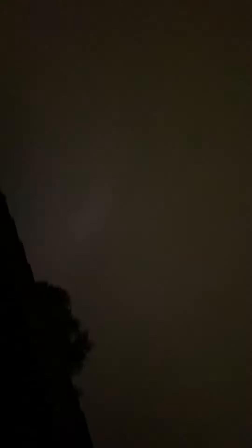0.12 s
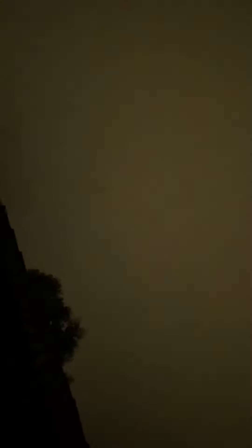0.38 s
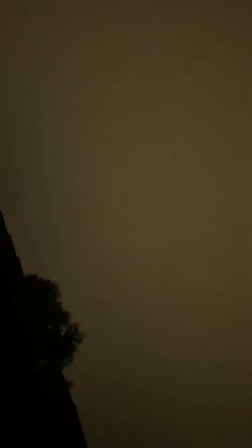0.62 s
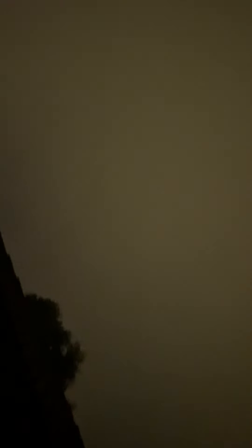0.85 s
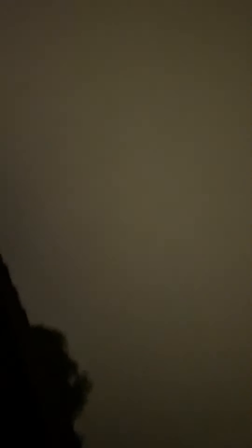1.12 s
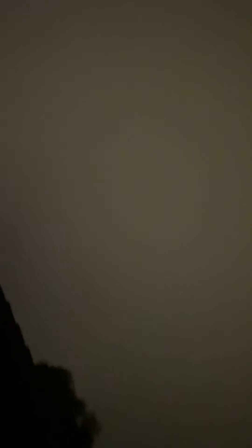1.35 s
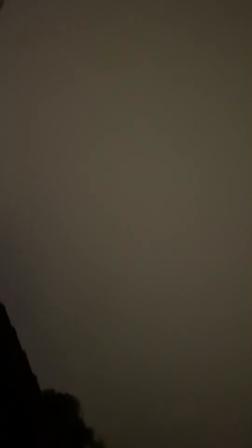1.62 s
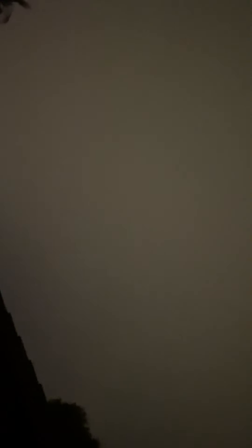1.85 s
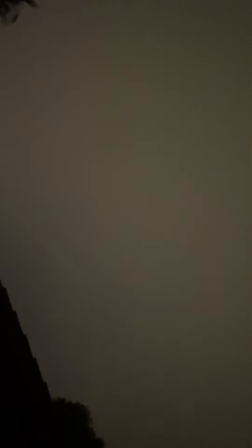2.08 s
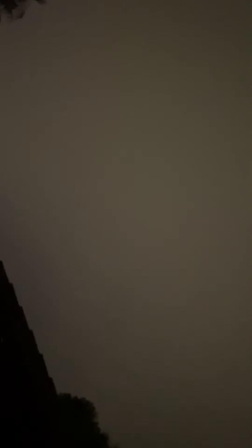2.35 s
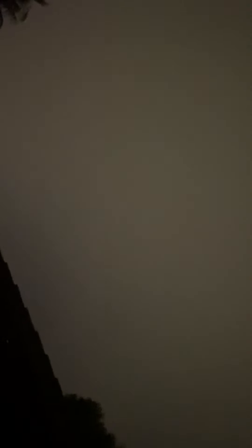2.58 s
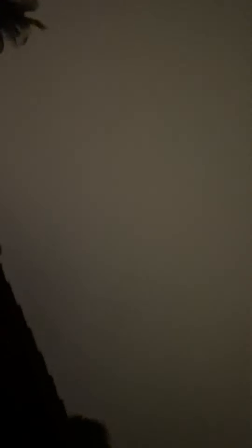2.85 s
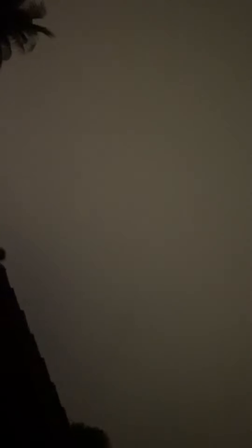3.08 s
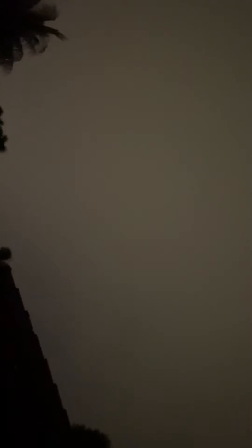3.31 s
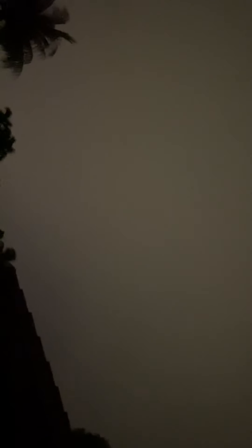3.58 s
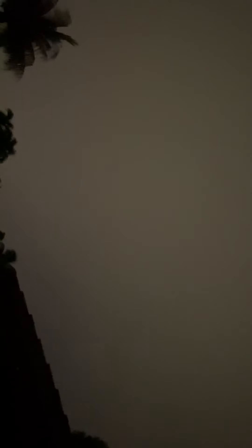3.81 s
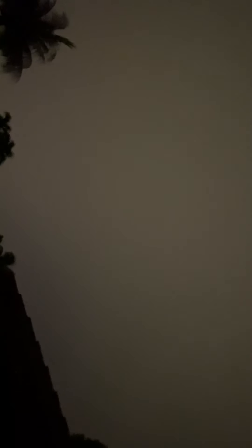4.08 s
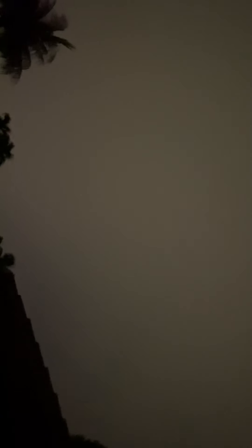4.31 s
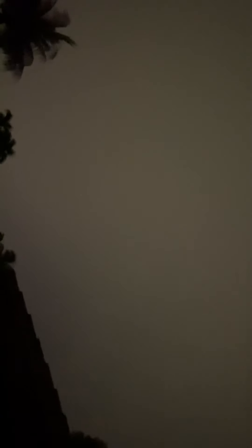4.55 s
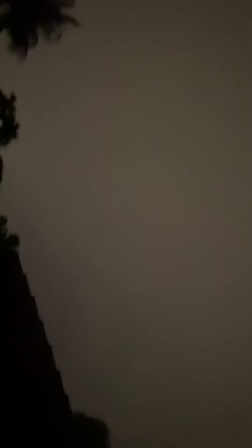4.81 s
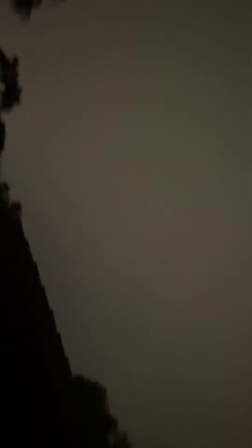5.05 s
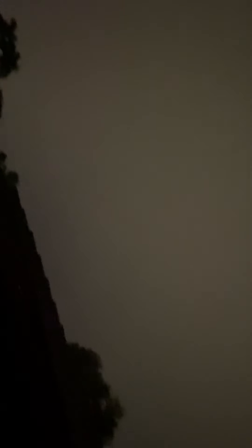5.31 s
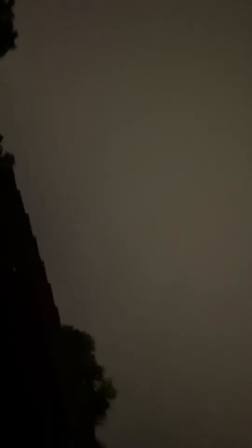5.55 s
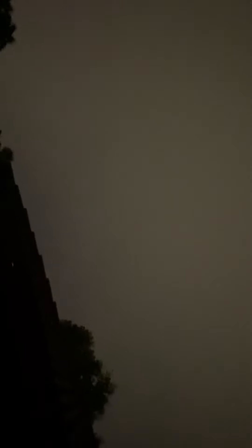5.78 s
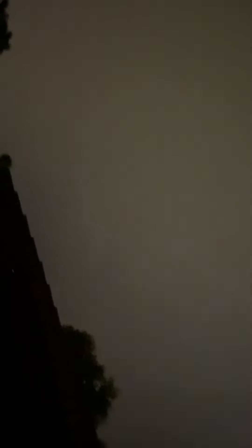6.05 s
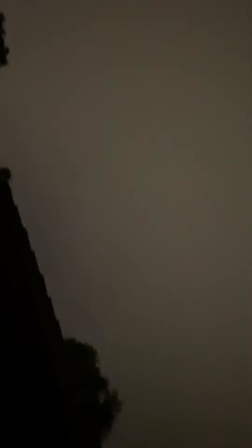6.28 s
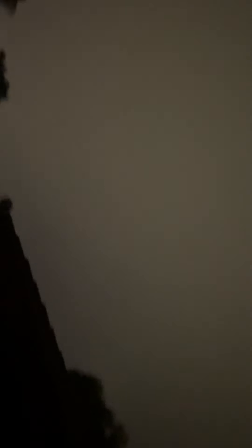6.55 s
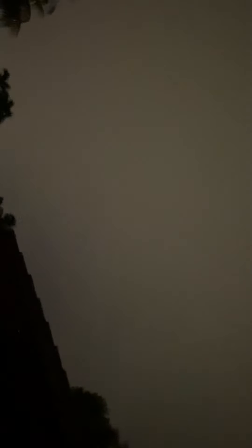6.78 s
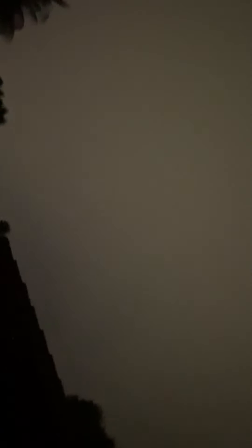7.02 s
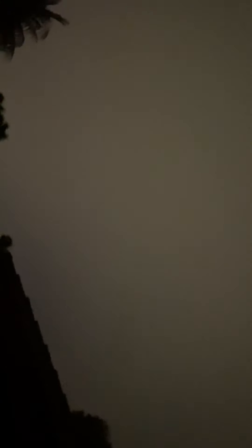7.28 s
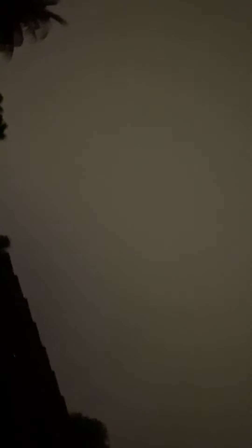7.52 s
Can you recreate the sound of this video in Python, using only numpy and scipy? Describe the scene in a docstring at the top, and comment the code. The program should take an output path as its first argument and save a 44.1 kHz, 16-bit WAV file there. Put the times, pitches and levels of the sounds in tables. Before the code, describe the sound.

Low rumbling thunder at night rises within two seconds and fades in smaller surges, while fine rain hisses and close drops tick, splash and ring metal.

```python
"""Thunder over a wet yard at night

Shocks from the bends of a far lightning channel arrive in peals: dense random blows through resonances.
Light rain is hissing noise with small sprays, and it rings a gutter; single drops splash close by,
each built from one or more ticks with a splash or ring.
A small two-port microphone weakens the deepest bass and turns left against right in the treble."""
import sys
import numpy as np
from scipy import signal
from scipy.fft import rfft, irfft, next_fast_len
from scipy.io import wavfile
from scipy.ndimage import uniform_filter1d, map_coordinates

SR = 44100
rng = np.random.default_rng(int(sys.argv[2]) if len(sys.argv) > 2 else 0)


def to_linear_factor(level_db):
    """Convert decibel levels (scalar or array-like) to linear amplitude factors."""
    exponent = np.asarray(level_db, float) / 20
    return 10 ** exponent


def file_out(sig):
    """Save sig as 16-bit WAV at sys.argv[1]."""
    # one column per channel
    cols = np.atleast_2d(sig).T
    # limit, then scale
    lim = np.clip(cols, -1, 1)
    pcm = np.round(lim * 32767).astype(np.int16)
    wavfile.write(sys.argv[1], SR, pcm)


N = 337010  # length in samples


def unit(x):
    """Scaled to rms 1."""
    return x / np.sqrt(np.mean(x ** 2) + 1e-20)


def along(points, hz):
    """Reads a curve of (Hz, value) points on a log frequency axis."""
    f, v = np.transpose(points)
    return np.interp(np.log(hz + 1), np.log(f + 1), v)


def curves(rows):
    """One value per sample for each column after the time."""
    s, *cols = np.transpose(rows)
    return [np.interp(np.arange(N) / SR, s, c) for c in cols]


def wobble(rate):
    """A smooth random curve through random knots, rate of them a second."""
    knots = rng.standard_normal(int(N * rate / SR) + 4)
    return map_coordinates(knots, [np.arange(N) * rate / SR])


def filtered(x, response):
    """x times a complex response of frequency."""
    m = next_fast_len(x.shape[-1] + 8192)
    spectrum = rfft(x, m) * response(np.fft.rfftfreq(m, 1 / SR))
    return irfft(spectrum, m)[..., :x.shape[-1]]


def resonance(hz, centre_hz, width_hz):
    """A causal resonance of peak gain 1."""
    return 1j * hz * width_hz / (centre_hz ** 2 - hz ** 2 + 1j * hz * width_hz)


def taps(rate, spread_db):
    """Random blows at both ports, rate of them a second at each, mostly small and a few large."""
    draw = rng.random((3, 2, N))
    struck = draw[0] < rate / SR
    sign = np.sign(draw[1] - .5)
    size = to_linear_factor(-spread_db * np.log(draw[2] + 1e-4))
    return struck * sign * size


def evened(x, even, span_s):
    """x with part of its chance swells taken out: even 0 leaves them, 1 takes out most."""
    span = int(span_s * SR)
    swell = uniform_filter1d(uniform_filter1d(unit(x) ** 2, span), span)
    return unit(x / (np.abs(swell) + 0.013) ** (even / 2))


def shocks(response, even, span_s):
    """A dense train of shocks in one colour; overlapping paths even out part of its swells."""
    x = filtered(taps(900, spread_db=1.5), response)
    x = evened(x, even, span_s)
    # a second pass deepens the colour by half
    return unit(filtered(x, lambda hz: np.sqrt(np.abs(response(hz)))))


# Claps that stand out of the roll. Each row: peak time in seconds, boom level in dB, length in seconds,
# centre of the boom in Hz, ringing of the yard in dB over the boom.
CLAPS = [(0.128, -26, 0.021, 99, -2), (0.188, -24, 0.028, 70.5, -28), (0.377, -27.5, 0.098, 69.8, -21),
         (0.583, -24.5, 0.044, 61.7, -12.5), (1.124, -27, 0.029, 73.4, 3), (1.152, -20, 0.048, 69.7, -8),
         (1.309, -21, 0.2, 82.8, -7.5), (1.576, -17.5, 0.038, 63.3, -3.5), (1.636, -12, 0.087, 66.5, -20.5),
         (1.765, -16.5, 0.072, 64.4, -22), (1.933, -38.5, 0.028, 66.2, -14.5),
         (2.104, -16, 0.049, 79, -18.5), (2.172, -25, 0.068, 74, -4.5), (2.292, -19, 0.023, 70.6, -10),
         (2.409, -34, 0.029, 70.3, -24), (2.585, -14.5, 0.041, 80.7, -23), (2.713, -15, 0.056, 81.7, -9),
         (2.798, -22, 0.046, 79, -36), (2.973, -21, 0.018, 73, -16), (3.559, -40, 0.047, 83.8, -2),
         (3.637, -26, 0.028, 77.8, -27), (3.721, -26.5, 0.044, 85, -2), (3.816, -26.5, 0.039, 78.4, -2.5),
         (4.016, -19, 0.069, 93.8, -5), (4.406, -29.5, 0.056, 64.2, -12.5),
         (4.609, -28.5, 0.05, 79.4, -8.5), (4.758, -20.5, 0.045, 79.2, -10.5),
         (5.076, -31.5, 0.11, 69.6, -13), (5.309, -33, 0.049, 75.3, -12), (5.416, -32, 0.069, 66.7, -30),
         (5.973, -33, 0.041, 70.2, -7.5), (6.196, -30.5, 0.082, 76, -37), (6.379, -27.5, 0.11, 71.8, -20.5),
         (6.666, -20, 0.047, 77.5, -29), (6.84, -24.5, 0.033, 77.5, -18),
         (6.924, -20.5, 0.034, 66.5, -17.5), (7.1, -19.5, 0.051, 76.3, -17.5),
         (7.385, -28, 0.074, 78.4, -17.5)]
CLAP_S, CLAP_DB, CLAP_LENGTH_S, CLAP_HZ, CLAP_YARD_DB = np.transpose(CLAPS)
RISE, FALL = 0.38, 0.55  # flanks of a clap, as shares of its length
FRONT_RISE, FRONT_FALL = .3, 0.94  # the upper parts of a clap strike faster and may ring longer


def claps(levels_db, rise, fall):
    """Power of all claps over time: each rises quickly and falls more slowly."""
    t = np.arange(0, N, 32) / SR - CLAP_S[:, None]  # one value for every 32 samples
    flank_s = CLAP_LENGTH_S[:, None] * np.where(t < 0, rise, fall)
    shape = np.exp(-(t / flank_s) ** 2)
    power = np.sum(to_linear_factor(levels_db)[:, None] ** 2 * shape, axis=0)
    return np.repeat(power, 32)[:N]


# Basic colour of the boom, scaled where it is played. Each row: frequency in Hz, strength in relative dB.
BOOM_COLOUR = [(13, -52.5), (22, -19), (39, -8), (59, 1), (80, -10.5), (113, -9), (140, -1.5), (180, -59.5),
               (310, -120)]
# Centre of the boom between claps, lower where longer shocks arrive. Each row: time in seconds, centre in Hz.
ROLL_CENTRE = [(0, 74.8), (.5, 69.4), (1.2, 68.7), (1.7, 61.4), (2.2, 62.8), (2.5, 78.8), (3.1, 74.4),
               (3.5, 73), (4.1, 62.6), (4.7, 73), (5.9, 66.8), (6.9, 67.2), (7.64, 70.8)]


def boom(roll_db):
    """Deep thunder: longer shocks sound deeper, so four fixed colours are cross-faded by a moving centre."""
    roll_power = to_linear_factor(roll_db + 1.34 * wobble(24)) ** 2
    power = roll_power + claps(CLAP_DB, RISE, FALL)
    # the loudest arrival sets the centre: a mean weighted by power
    roll_hz = curves(ROLL_CENTRE)[0] * (1 + 0.028 * wobble(5.7))
    clap_power_hz = claps(CLAP_DB + 10 * np.log10(CLAP_HZ), RISE, FALL)
    centre_hz = (roll_power * roll_hz + clap_power_hz) / power
    mix = 0
    colours_hz = [54, 68, 86, 112]
    shares = np.array([np.exp(-(np.log(centre_hz / c) / .2) ** 2) + .12 for c in colours_hz])
    shares = shares / np.linalg.norm(shares, axis=0)
    for share, c in zip(shares, colours_hz):
        colour = lambda hz: to_linear_factor(0.37 * along(BOOM_COLOUR, hz)) * resonance(hz, c, 0.32 * c)
        mix = mix + share * shocks(colour, even=0.39, span_s=0.018)
    # the colours beat against each other less than their sum swells
    return np.sqrt(power) * evened(mix, even=0.78, span_s=0.077)


# Standing wave between the houses. The row: centre in Hz, width in Hz.
YARD = (163, 15)


def yard(near_db):
    """The yard resonates under the shocks; between claps it gains as the growl passes -46.5 dB."""
    roll_db = near_db - 2.5 + 0.18 * (near_db + 46.5)
    power = to_linear_factor(roll_db + 2.8 * wobble(23)) ** 2
    power = power + claps(CLAP_DB + CLAP_YARD_DB, FRONT_RISE, FRONT_FALL)
    return np.sqrt(power) * shocks(lambda hz: resonance(hz, *YARD), even=0.6, span_s=0.031)


# Basic colour of the growl, scaled where it is played. Each row: frequency in Hz, strength in relative dB.
GROWL_COLOUR = [(110, -39.5), (185, -5.5), (226, -1.5), (274, -5.5), (365, -12), (426, -20.5), (502, -18.5),
                (730, -35.5), (800, -36), (1040, -62.5), (1760, -120)]


def growl(near_db):
    """Shocks of nearer bends; sharp claps that ring the yard growl more."""
    clap_growl_db = CLAP_DB - 15 + 0.25 * CLAP_YARD_DB
    power = to_linear_factor(near_db + 1.72 * wobble(10)) ** 2 + claps(clap_growl_db, FRONT_RISE, FALL)
    colour = lambda hz: to_linear_factor(1.08 * along(GROWL_COLOUR, hz))
    return np.sqrt(power) * shocks(colour, even=0.049, span_s=0.022)


# Upper bass kept by the nearest bends. The row: centre in Hz, width in Hz.
RASP = (314, 293)


def rasp(level_db):
    """Shocks of the nearest bends, through the same resonance twice."""
    train = shocks(lambda hz: resonance(hz, *RASP) ** 2, even=0.12, span_s=.013)
    return train * to_linear_factor(level_db + 0.94 * wobble(11))


def far_thunder():
    """Thunder from the far end of the storm never quite stops: a steady low train of shocks."""
    return to_linear_factor(-47.0) * shocks(lambda hz: resonance(hz, 59, 46), even=0.26, span_s=0.073)


# The roll under the claps. Each row: time in seconds, deep boom in dB, growl of nearer bends in dB,
# rasp of the nearest bends in dB over the growl.
ROLL = [(0, -35, -43.5, -1), (.3, -32.5, -39, -7), (.55, -38.5, -41, -6.5), (.75, -30.5, -47, 4.5),
        (.95, -36.5, -47.5, 0.5), (1.108, -44, -48, -3.5), (1.125, -27, -32, -22), (1.25, -26.5, -38, -8.5),
        (1.45, -23, -40, -8), (1.55, -14, -28.5, -16), (1.8, -22.5, -38.5, -7), (1.9, -25.5, -39, -8),
        (2.25, -27.5, -37, -13.5), (2.46, -35, -37, -11.5), (2.53, -23.5, -35, -10.5),
        (2.65, -25, -34.5, -12), (2.76, -23.5, -36, -8.5), (2.9, -28, -41, -6), (3.2, -34, -41, -9),
        (3.45, -39, -48.5, -4.5), (4.15, -32.5, -44.5, -7.5), (4.32, -40, -48, -17), (4.45, -32, -43, -8.5),
        (4.85, -35, -45.5, -9.5), (5.12, -45.5, -49, -6), (5.24, -45.5, -53.5, -1), (5.36, -32.5, -49, -3),
        (5.85, -36.5, -48, -10), (6.3, -31, -44, -10), (6.55, -31, -40.5, -7), (6.8, -24.5, -36, -8.5),
        (6.96, -26, -37, -10), (7.15, -28.5, -36.5, -10), (7.3, -30.5, -39, -11), (7.64, -32.5, -48.5, -6)]


def thunder():
    """A slow roll with claps on it drives the boom, the ringing of the yard and the growl of nearer bends."""
    roll_db, near_db, rasp_db = curves(ROLL)
    return boom(roll_db) + yard(near_db) + growl(near_db) + rasp(near_db + rasp_db) + far_thunder()


def patchy(x, frame, depth_db, bins, frames):
    """x with random patches of loudness, smoothed over so many frequency bins and time frames."""
    z = signal.stft(x, nperseg=frame)[2]
    field = rng.standard_normal(z.shape[1:])
    field = uniform_filter1d(uniform_filter1d(field, size=bins, axis=0), size=frames, axis=1)
    return signal.istft(z * to_linear_factor(depth_db * unit(field)), nperseg=frame)[1][:, :N]


# Colour of the far rain. Each row: frequency in Hz, strength in relative dB per Hz.
HISS = [(250, 4.5), (450, -3.5), (700, -4), (1200, -7), (2000, -9), (4000, -17), (6000, -22.5), (9000, -38),
        (14500, -30), (16500, -39.5)]


def rain_hiss():
    """Far rain: many drops blend into patchy noise that wavers slowly."""
    noise = patchy(rng.standard_normal((2, N)), frame=512, depth_db=1.5, bins=16, frames=10)
    hiss = unit(filtered(noise, lambda hz: to_linear_factor(along(HISS, hz))))
    return to_linear_factor(-52.5 + .6 * wobble(5.3)) * hiss


# Modes of the gutter. Each row: centre in Hz, width in Hz, strength in dB.
GUTTER = [(878, 40, -6.5), (1248, 40, -16), (1397, 18, -.5), (1482, 36, -7), (1600, 70, -14),
          (2470, 150, -13), (4200, 180, -21), (5245, 60, -22)]


def gutter(hz):
    """Response of all the modes of the gutter together, with alternating signs."""
    return sum((-1) ** k * to_linear_factor(db) * resonance(hz, c, w) for k, (c, w, db) in enumerate(GUTTER))


def gutter_ring():
    """Many small drops wander along the gutter, so its modes come and go one by one."""
    ring = filtered(taps(900, spread_db=2.5), gutter)
    ring = unit(patchy(ring, frame=1024, depth_db=2.7, bins=2, frames=14))
    return to_linear_factor(-59.5 + 2.5 * wobble(22)) * ring


def leaf_grains():
    """Tiny dry ticks of drops on leaves: sparse blows through a broad resonance, twice."""
    grains = filtered(taps(110, spread_db=2), lambda hz: resonance(hz, 3300, 3500) ** 2)
    return to_linear_factor(-74) * unit(grains)


def patter():
    """Nearer drops leave short bright sprays: noise bursts in four bands, each dying by 60 dB in 0.11 s."""
    fading = to_linear_factor(-60 * np.arange(SR // 5) / SR / .11)
    out = 0
    for centre_hz, db in [(2800, -73), (4800, -76), (9000, -77), (13500, -77)]:
        bursts = signal.fftconvolve(np.abs(taps(16, spread_db=2.5)[0]), fading)[:N]
        noise = bursts * rng.standard_normal((2, N))
        band = filtered(noise, lambda hz: resonance(hz, centre_hz, 1.6 * centre_hz) ** 2)
        out = out + to_linear_factor(db) * unit(band)
    return out


def rain():
    """Far rain is a hiss in patches; nearer drops ring the gutter, tick and leave short bright sprays."""
    return rain_hiss() + gutter_ring() + patter() + leaf_grains()


# Parts of near drops: each is a tick with a splash or ring, and a drop may have several rows.
# Each row: start in seconds, level in dB, centre in Hz, width as a share of the centre,
# seconds the splash or ring takes to die by 60 dB.
DROP_PARTS = [(0.076, -51, 12750, 0.21, 0.17), (0.5268, -38.5, 4320, 0.84, 0.17),
              (0.527, -42, 5240, 0.075, 0.2), (0.535, -52, 4200, 0.068, 0.17),
              (0.546, -46, 5600, 0.18, 0.19), (0.6146, -43, 12400, 5.3, 0.26),
              (0.627, -46.5, 2970, 1.3, 0.23), (0.698, -48, 12400, 1.4, 0.054),
              (0.723, -49.5, 9850, .6, 0.089), (.857, -37, 3480, 1.1, 0.022),
              (1.04, -51.5, 4050, 1.2, 0.28), (1.848, -42, 3760, 0.9, 0.054),
              (2.03, -40.5, 13300, 8.3, 0.14), (2.6708, -38.5, 3610, 1.4, 0.015),
              (2.68, -42, 8970, 2, 0.14), (2.8205, -39, 3000, 0.94, 0.017),
              (2.9609, -39.5, 3900, 1.2, 0.012), (2.9721, -35.5, 4020, 1.5, 0.012),
              (2.9768, -40, 5580, 1.6, 0.014), (2.9906, -34.5, 2380, 0.35, 0.014),
              (2.9913, -34, 5400, 0.74, .012), (3.011, -51.5, 11500, 0.67, .015),
              (3.136, -51, 8970, 1.8, .015), (3.161, -47, 8000, 2.9, .16), (3.252, -49, 2950, 1.3, 0.063),
              (3.307, -52, 13070, 1.4, .13), (3.442, -46, 14300, 1.8, .15),
              (4.219, -34, 4300, 0.062, 0.083), (4.2217, -36.5, 3640, 0.22, 0.087),
              (4.232, -39.5, 3940, 0.36, 0.037), (4.2202, -40.5, 2280, 0.33, 0.039),
              (4.239, -50.5, 11460, 0.42, 0.1), (4.309, -60, 11500, .2, 0.054),
              (4.4285, -31.5, 13680, 0.14, 0.017), (4.4284, -27.5, 7720, 10, 0.15),
              (4.4284, -37, 5300, 0.05, 0.1), (4.59, -45, 3410, 2, 0.14), (4.598, -41.5, 2470, 0.97, 0.068),
              (4.9038, -42.5, 11820, 0.23, 0.082), (4.9047, -38, 7000, 4, 0.11),
              (5.171, -50.5, 12400, 0.52, 0.081), (5.345, -56, 14200, .6, 0.16),
              (5.383, -48.5, 3460, 0.41, 0.026), (5.628, -48, 3920, 1, 0.2),
              (5.66, -61.5, 4300, 0.11, 0.68), (6.111, -44, 6000, 2, 0.03), (6.255, -52, 4000, 0.8, 0.1),
              (6.313, -54, 5050, .03, 0.049), (6.337, -54, 10950, 0.18, .03),
              (6.416, -52.5, 5630, 0.12, .22), (6.531, -57.5, 8970, 2, 0.024),
              (6.6276, -46.5, 11160, 0.13, 0.15), (6.81, -50, 6470, 2.9, 0.025),
              (6.813, -52, 5300, 0.13, 0.13), (6.918, -51, 3830, 0.22, 0.11), (6.931, -47, 2690, 0.57, 0.2),
              (6.942, -49, 3420, 0.067, 0.12), (7.25, -47, 2300, .4, 0.068),
              (7.475, -57, 4200, 0.18, 0.051)]
SNAP, CRACKLE, TICK_S = 4.5, .5, .0003  # the instant of impact, the crackle around it and its rise time


def near_drops():
    """Near drops, of one or more parts: a sharp tick with a splash or ring dying away around its own pitch."""
    out, t = np.zeros((2, N + SR)), np.arange(SR // 3) / SR
    for s, db, hz, width, t60 in DROP_PARTS:
        crackle = rng.standard_normal(len(t)) * (t / TICK_S) * np.exp(1 - t / TICK_S)
        tick = CRACKLE * crackle + SNAP * (t == t[4])
        splash_db = -7 + 3.5 * np.log2(t60 / 0.16)  # longer splashes are also stronger
        splash = rng.standard_normal((2, len(t))) * to_linear_factor(splash_db - 60 * t / t60)
        level = np.sqrt(16000 / (width * hz))  # makes up for narrow bands
        inner_hz = (0.55 + 0.35 * width) * hz  # width of the second resonance
        colour = lambda f: level * resonance(f, hz, width * hz) * resonance(f, hz, inner_hz)
        spray = lambda f: to_linear_factor(-27.0) * resonance(f, 5300, 18000)
        part = filtered(tick + splash, lambda f: colour(f) + spray(f))
        out[:, round(s * SR):][:, :len(t)] += to_linear_factor(db) * part
    return out[:, :N]


# The louder drips that knock on the gutter. Each row: time in seconds, strength in relative dB.
KNOCKS = [(0.33, -43), (0.38, -42.5), (0.521, -45), (0.622, -41), (1.031, -51), (2.305, -42.5),
          (2.502, -43), (2.881, -51), (2.963, -45), (3.146, -39.5), (3.447, -46), (3.932, -44),
          (4.125, -44.5), (4.243, -54), (4.425, -38), (4.589, -39), (4.782, -50), (5.234, -44),
          (5.554, -41), (5.622, -44), (5.787, -41), (5.832, -49), (5.87, -49), (6.058, -43), (6.413, -43.5),
          (6.925, -42), (7.32, -48)]


def gutter_knocks():
    """Drips strike the gutter's modes; the contact of a drip favours the middle ones."""
    chance = rng.random((2, N))
    # about two softer drips a second fall at random
    blows = (chance[0] < 2 / SR) * to_linear_factor(-57.2 + 3.2 * chance[1])
    s, db = np.transpose(KNOCKS)
    blows[np.round(s * SR).astype(int)] = to_linear_factor(db)
    # a drip lands as a short flurry, not one blow
    fading = to_linear_factor(-60 * np.arange(SR // 3) / SR / 0.16)
    flurry = rng.standard_normal(N) * signal.fftconvolve(blows, fading)[:N] + 4 * blows
    # the blow needs more force than the ring that is heard
    return filtered(to_linear_factor(20) * flurry, lambda f: gutter(f) * resonance(f, 1500, 790))


def scene():
    """What reaches the two microphone ports."""
    return thunder() + rain() + near_drops() + gutter_knocks()


def low_pass(x):
    """Removes everything above the highest recorded frequency."""
    return signal.sosfilt(signal.butter(12, 17030, fs=SR, output="sos"), x)


# Turn of the sound from the sum towards the difference of the ports. Each row: frequency in Hz, radians.
TURN = [(40, .008), (110, .024), (200, .057), (380, .15), (700, .37), (1100, .4), (2000, .34), (3300, .45),
        (4800, .55), (6000, .9), (7000, 1.5), (7900, 1.64), (9800, 3.06), (10900, 3.22), (12750, 4.63),
        (14100, 4.8), (15600, 6.0)]
# Likeness of the sound at the two ports. Each row: frequency in Hz, likeness from 0 to 1.
ALIKE = [(1800, 0.1), (3000, .6), (6000, .7), (16000, 0.9)]
# Leaning to the left, or to the right below zero. Each row: frequency in Hz, share of the sum.
LEAN = [(40, 0), (90, -.008), (140, -.035), (250, -.07), (500, -.08), (1000, .02), (2200, -.01)]


def record(dry):
    """The microphone favours 50 Hz to 16 kHz and mixes its ports to a sum and a difference by frequency."""
    # some bass below 49 Hz is left; nothing above 15880 Hz
    dry = filtered(dry, lambda hz: (hz < 15880) * (.22 + 1 / np.sqrt(1 + (49 / (hz + 1)) ** 18)))
    mid = filtered(dry[0], lambda hz: np.cos(along(TURN, hz)))
    shared = filtered(dry[0], lambda hz: along(ALIKE, hz))
    separate = filtered(dry[1], lambda hz: np.sqrt(1 - along(ALIKE, hz) ** 2))
    side = filtered(shared + separate, lambda hz: 1j * np.sin(along(TURN, hz)))
    side = side + filtered(mid, lambda hz: along(LEAN, hz))
    return low_pass(np.array([mid + side, mid - side]))


dry = scene()
out = record(dry)
file_out(out)
```